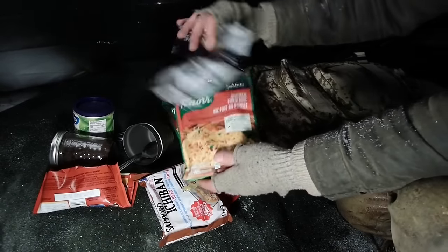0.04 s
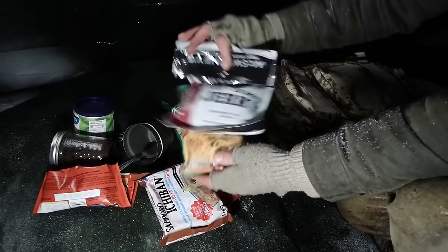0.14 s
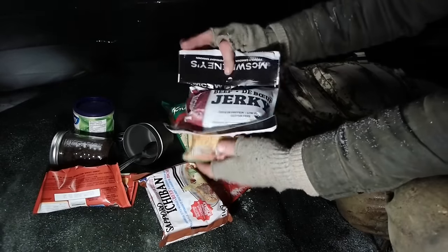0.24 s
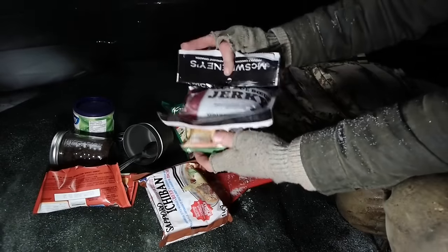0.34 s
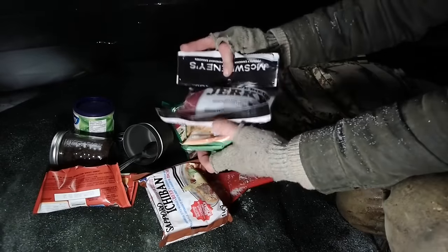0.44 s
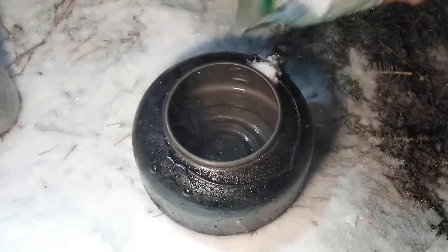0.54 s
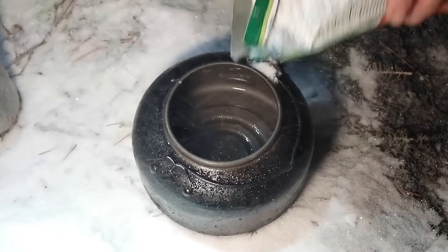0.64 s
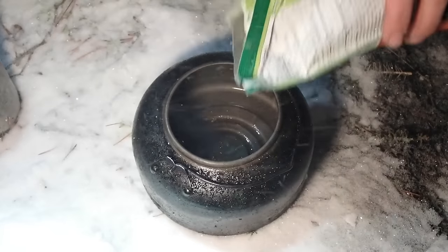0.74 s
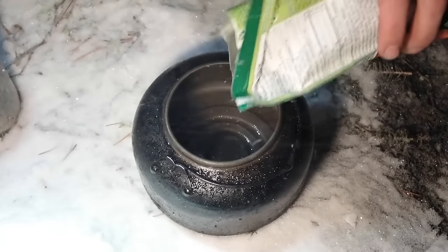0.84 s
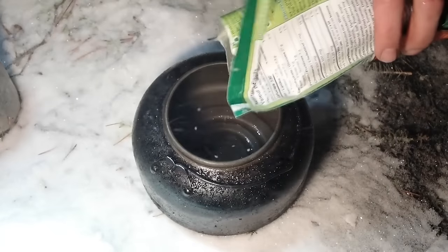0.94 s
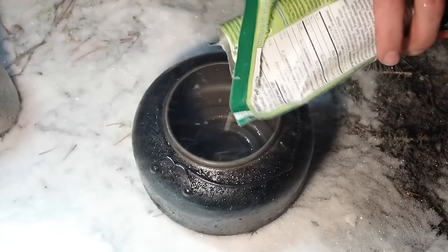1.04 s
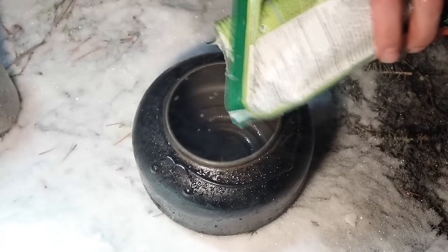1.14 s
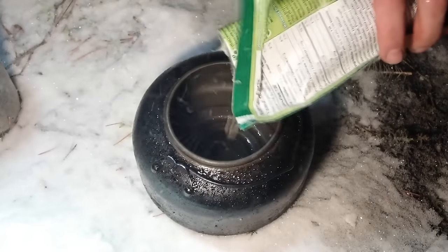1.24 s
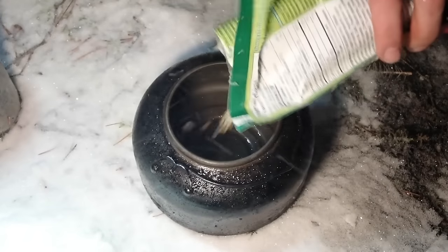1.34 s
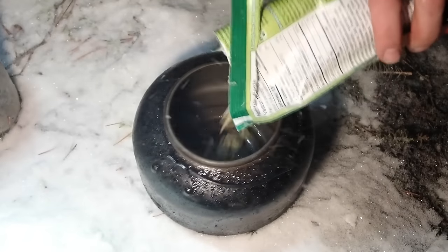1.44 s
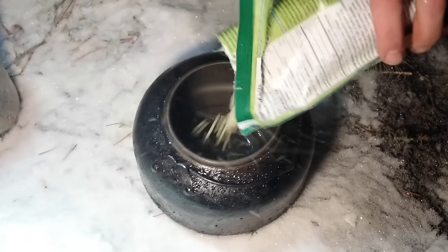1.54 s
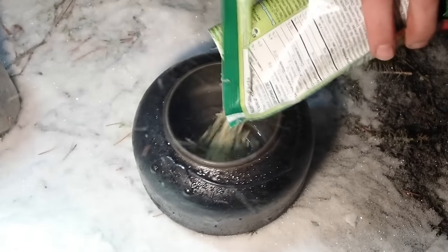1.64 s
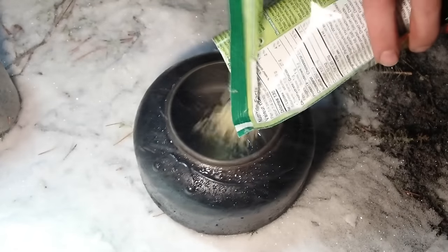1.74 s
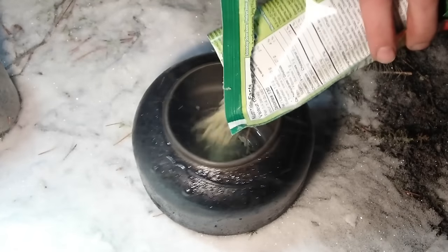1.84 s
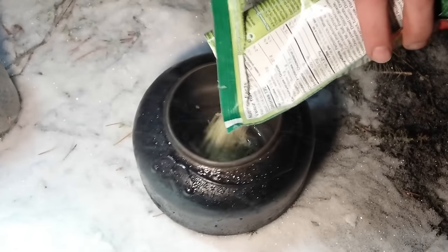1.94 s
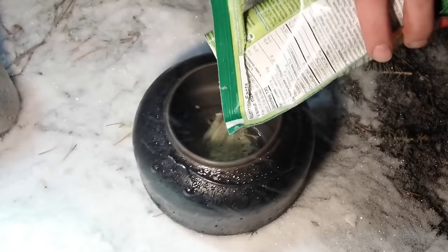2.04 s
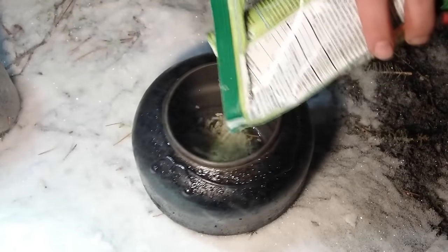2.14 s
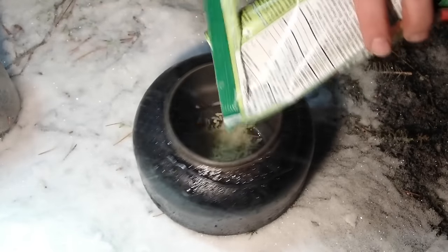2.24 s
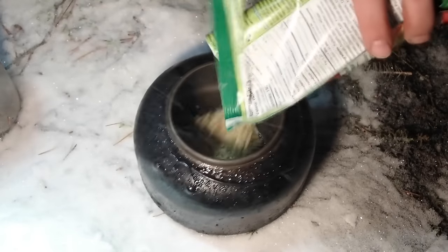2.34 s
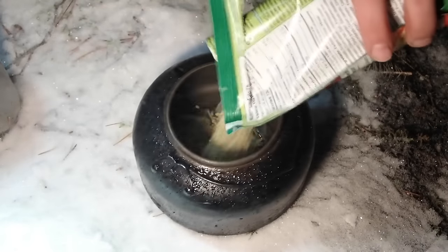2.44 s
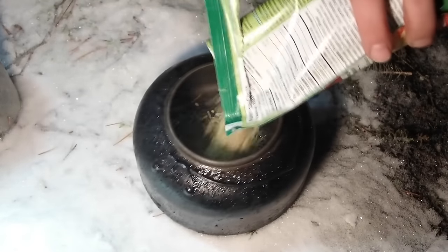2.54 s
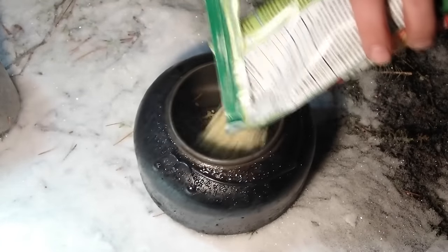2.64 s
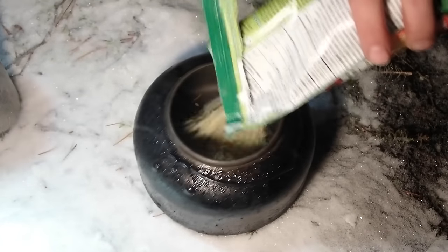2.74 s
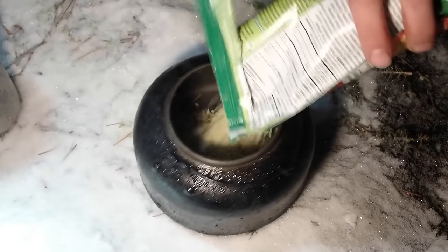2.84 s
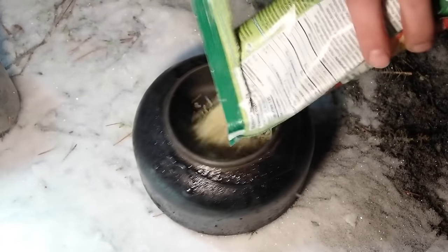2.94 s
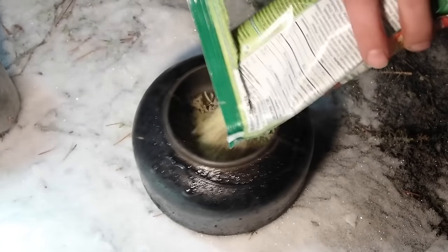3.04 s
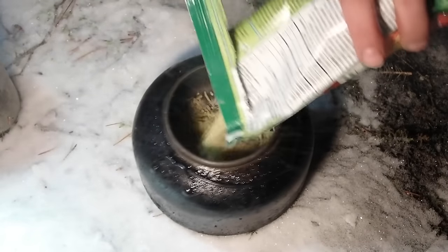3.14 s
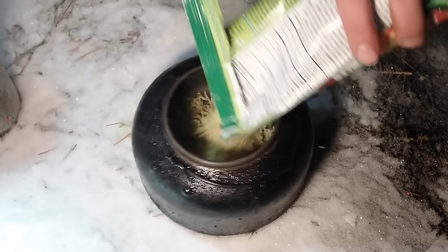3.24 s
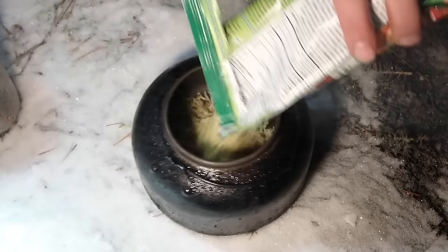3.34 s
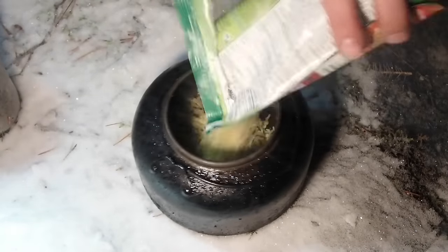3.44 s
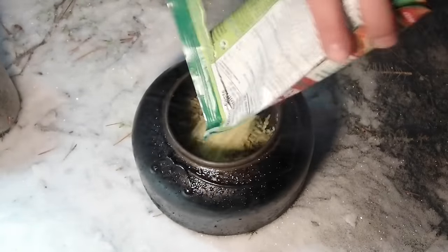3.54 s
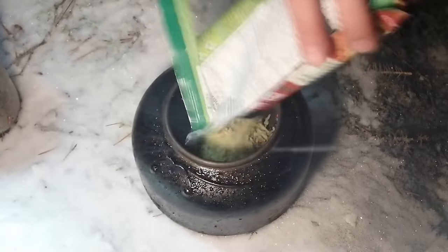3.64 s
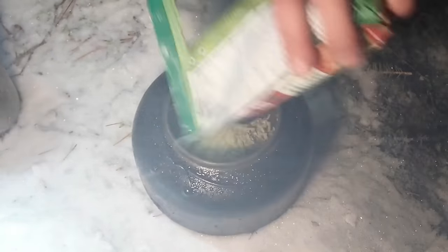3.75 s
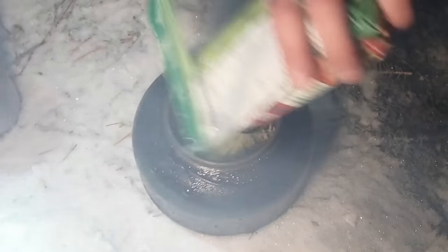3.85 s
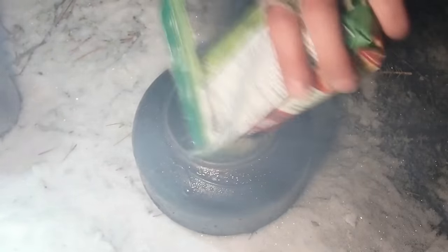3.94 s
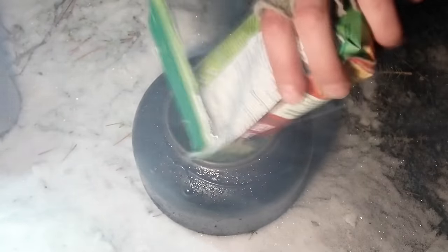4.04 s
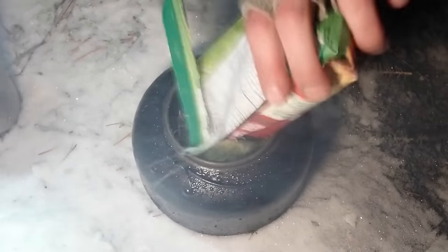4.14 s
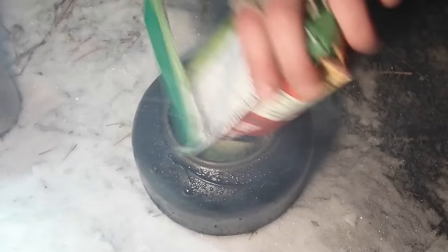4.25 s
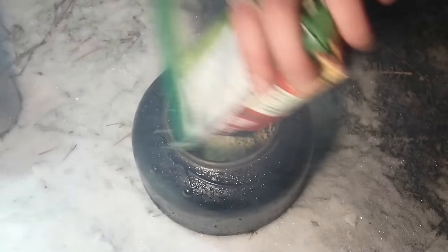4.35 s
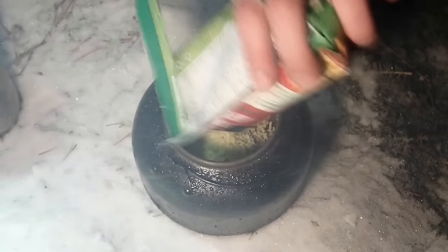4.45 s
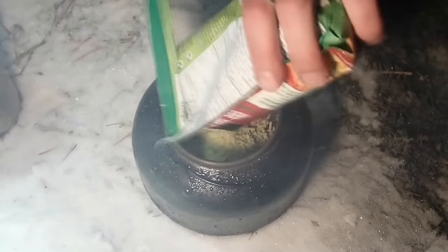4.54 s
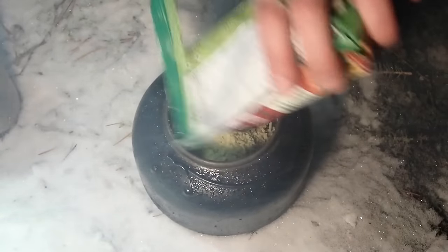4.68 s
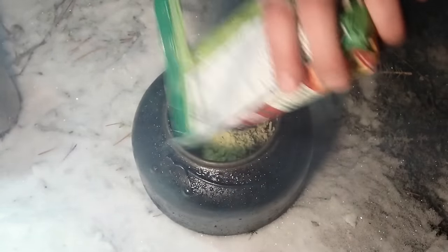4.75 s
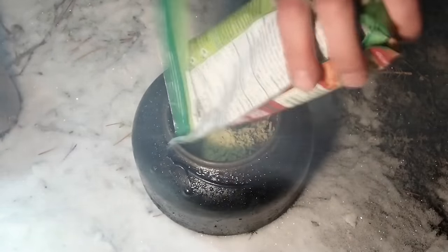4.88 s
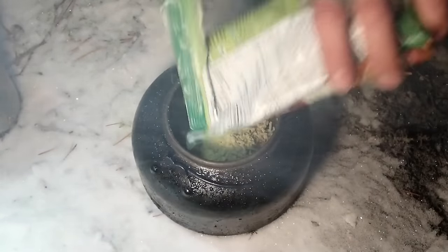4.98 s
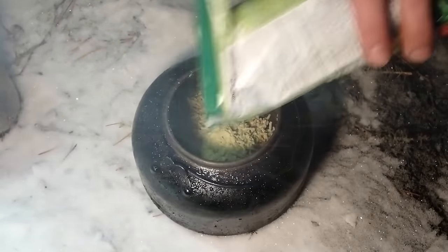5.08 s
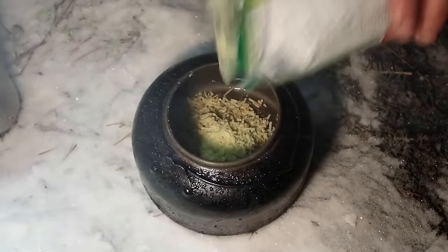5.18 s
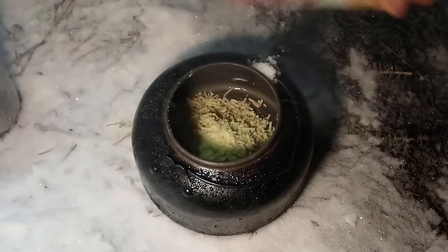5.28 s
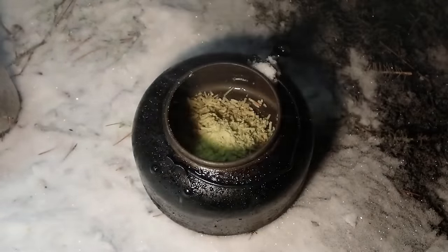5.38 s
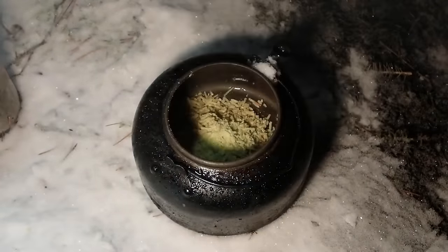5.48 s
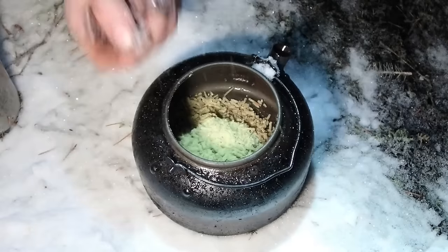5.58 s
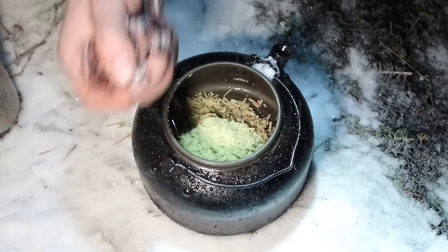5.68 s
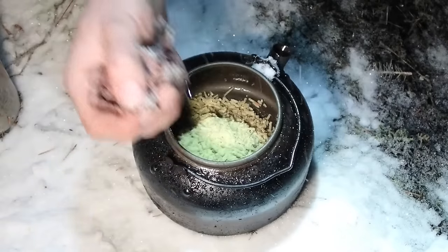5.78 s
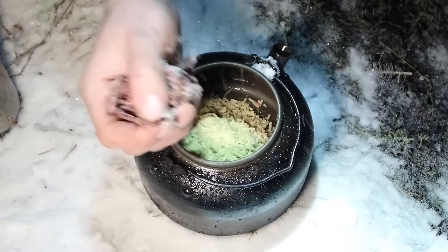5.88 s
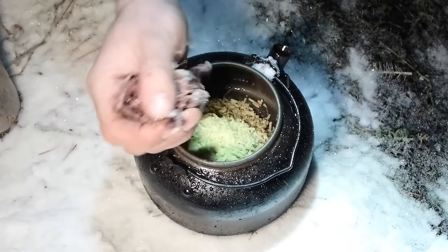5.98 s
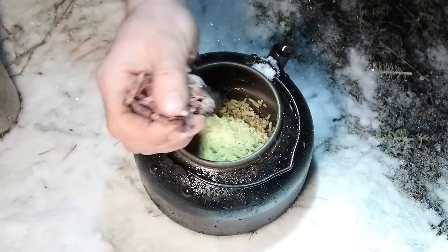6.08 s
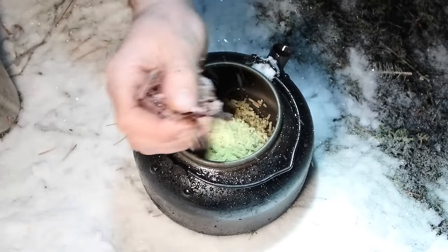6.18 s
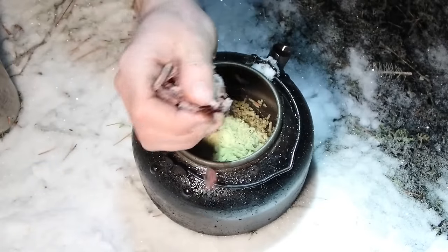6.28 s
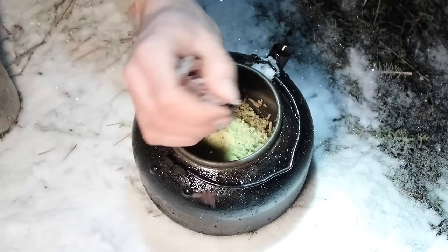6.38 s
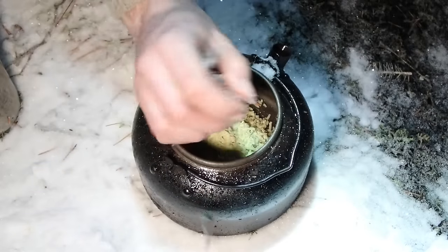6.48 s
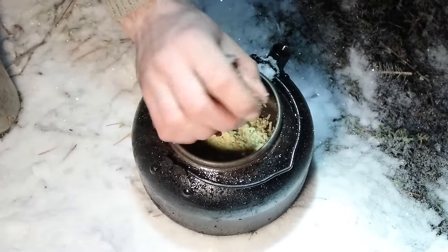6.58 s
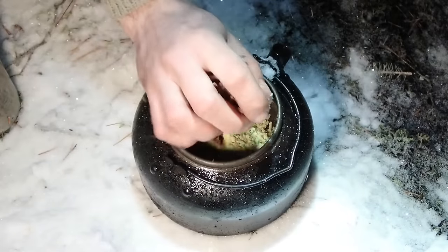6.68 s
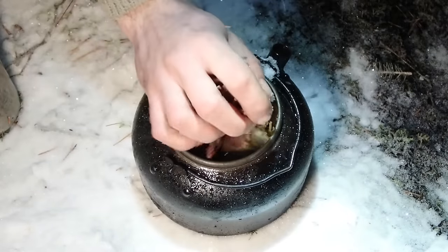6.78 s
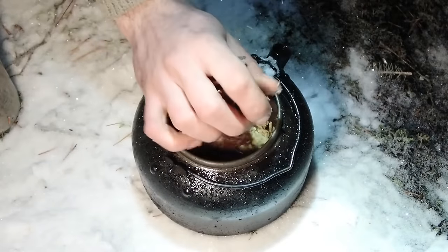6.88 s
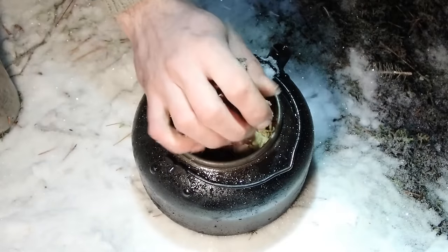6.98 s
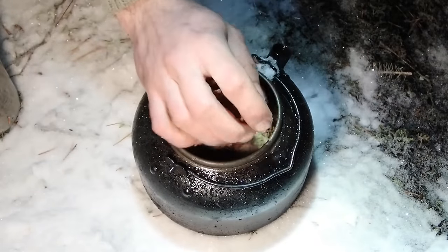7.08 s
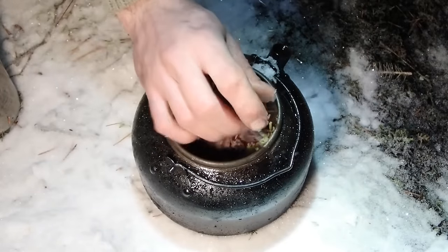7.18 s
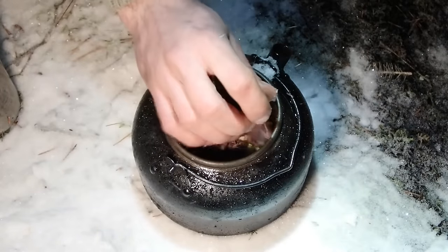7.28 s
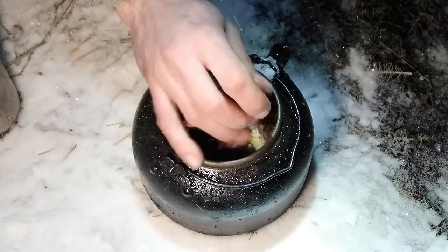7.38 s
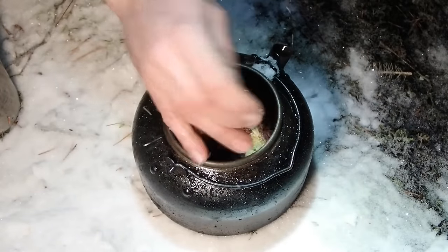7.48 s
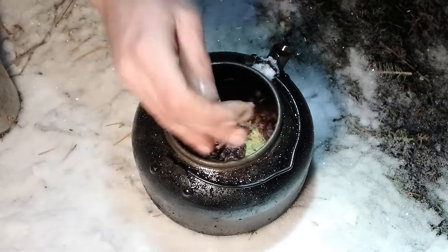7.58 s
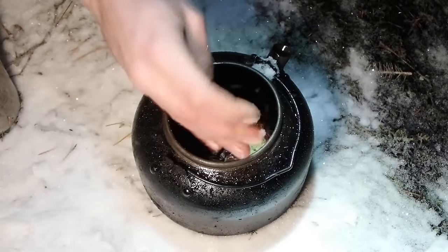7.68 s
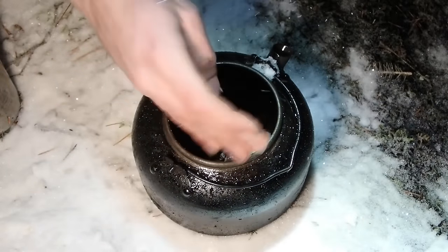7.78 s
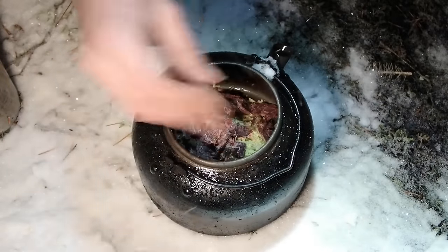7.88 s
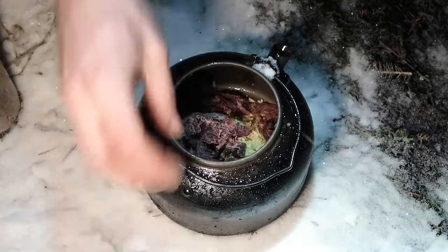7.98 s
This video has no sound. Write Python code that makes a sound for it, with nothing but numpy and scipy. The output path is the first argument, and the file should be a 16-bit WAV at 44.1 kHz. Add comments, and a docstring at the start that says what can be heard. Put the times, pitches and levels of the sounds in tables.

```python
"""Outdoors, close to the microphone: a jerky pouch is set down and dry rice is shaken into a metal kettle.
Streams of tiny impacts make the rice: it drums on the paper packet, rattles on bare metal, then lands on its heap.
Filtered bursts make the jolts and snaps of the emptying packet and the pieces of jerky dropped inside.
Dying sines ring the kettle: its bottom, its rim, its hollow, and the sharp clank when a hand knocks it."""
import sys
import numpy as np
from scipy import signal
from scipy.fft import rfft, irfft
from scipy.io import wavfile
from scipy.ndimage import uniform_filter1d

SR = 44100
rng = np.random.default_rng(int(sys.argv[2]) if len(sys.argv) > 2 else 0)


def digitize_waveform(pressure):
    """Quantize a signal to 16-bit integers and store it at the path in sys.argv[1].

    Rows of a 2-D input are taken as channels; values are limited to [-1, 1].
    """
    field = np.atleast_2d(pressure).T
    bounded = np.clip(field, -1, 1)
    quanta = np.round(bounded * 32767).astype(np.int16)
    wavfile.write(sys.argv[1], SR, quanta)


N = 353726
TIME = np.arange(N) / SR  # seconds

# Levels are relative: each layer adds its own gain. A t60 is the time to fall by 60 dB.

# Quiet outdoor background. Each row: frequency in Hz, level in dB.
AIR_SPECTRUM = [(12, -41.5), (20, -6.5), (60, -4.5), (91, -8.5), (210, -20.5), (607, -15.5), (759, -18),
                (1220, -20), (1400, -19.5), (1570, -19.5), (1710, -62), (3740, -38.5), (16000, -45.5)]
AIR_DB = -47

# A sleeve brushes past. Each row: time in seconds, level in dB.
SLEEVE_LEVEL = [(0, -34.5), (.5, -49), (5.25, -44.5), (5.47, -48), (5.57, -39.5), (5.75, -40.5), (6, -46),
                (6.6, -52), (7.8, -49), (8.02, -42)]
# Cloth, soft flaps of its folds, and air on the microphone. Each row: frequency in Hz, level in dB.
CLOTH_SPECTRUM = [(59, -23.5), (100, 2.5), (244, -2), (358, -2.5), (424, -8.5), (662, -9.5), (1680, -7.5),
                  (5770, -24.5), (9410, -27), (16000, -38.5)]
FLAP_SPECTRUM = [(60, -10), (250, 0), (800, -1), (1500, -7), (4000, -26), (16000, -45)]
PUFF_SPECTRUM = [(15, -8), (35, -4), (70, -8), (140, -19), (600, -55)]
# Air buffets the microphone. Each row: start in seconds, level in dB.
AIR_PUFFS = [(1.655, -14.5)]

# The jerky pouch is slapped down and settles.
# Each row: start in seconds, crack in dB, centre in Hz, decay constant in seconds, thud in dB.
POUCH_SLAPS = [(.008, -27.5, 1520, .004, -22), (.131, -4.5, 2860, 0.004, -52),
               (.189, -4.5, 3270, 0.0048, -13.5), (.202, -9, 4030, 0.0089, -42),
               (.215, -23, 3350, 0.057, -49), (0.274, -10.5, 1310, 0.00073, -16.5),
               (.411, 1, 2920, 0.0027, -13.5), (.478, -12, 756, 0.0013, -27)]
# The pouch slides over its neighbours. Each row: peak time in seconds, level in dB, half length in seconds.
POUCH_RUSTLES = [(0.119, -33.5, 0.036), (0.364, -36, 0.09)]
# Jerky shifts in the closed hand with dull ticks. Each row: start in seconds, level in dB.
JERKY_SHIFTS = [(5.947, -32.5), (6.084, -36), (6.206, -33), (7.556, -33.5)]
SHIFT_HZ, SHIFT_FADE_S = 1000, 0.0041
# Dull thud of the pouch and of the packet. Each row: frequency in Hz, level in dB.
THUD_SPECTRUM = [(50, -22.5), (150, -12.5), (260, -5.5), (380, -2.5), (560, -12.5), (900, -19.5),
                 (1400, -18), (4000, -41.5)]

# Light touches set the rim ringing. Each row: start in seconds, level in dB, brightness in Hz.
RIM_TOUCHES = [(3.358, -26, 11250), (3.574, -31, 11900), (3.802, -15, 8500), (3.918, -24.5, 9050),
               (4.09, -22, 12000), (4.176, -19, 11000), (4.224, -24, 11000), (4.242, -19, 9000),
               (4.45, -23, 10000), (4.69, -30, 10000), (4.976, -25, 10200), (6.879, -35, 7000),
               (7.086, -30, 3500), (7.256, -30, 3500), (7.273, -31.5, 3500)]
# The kettle's rim. Each row: frequency in Hz, level in dB, t60 in seconds.
RIM_MODES = [(4400, 9, 0.048), (4640, -21.5, 0.042), (5060, 10.5, 0.048), (5500, -7, .06),
             (5770, 9.5, 0.042), (7600, -14.5, 0.044), (8700, 12, 0.046), (9560, 12, 0.012),
             (10300, -18, 0.066), (10740, 1, 0.083)]
# Stray grains and crumbs tick. Each row: start in seconds, level in dB.
CRUMB_TICKS = [(5.335, -27), (5.523, -22), (5.545, -23.5), (6.001, -13.5), (6.257, -21), (6.468, -17),
               (6.849, -16), (7.397, -19)]
# A scrape and a crumb on the rim. Each row: frequency in Hz, level in dB.
SCRAPE_SPECTRUM = [(1500, -8), (3700, -9), (4900, 1.5), (6200, -8), (7500, -9), (9500, -8), (16000, -20)]
CRUMB_SPECTRUM = [(300, -13), (2000, 8.5), (5000, 11), (10000, 9.5), (16000, -6)]

# Fingers and jerky rub along the rim. Each row: peak time in seconds, level in dB, half length in seconds.
RUB_STROKES = [(6.386, -43.5, .025), (6.52, -51, .09), (6.9, -42, 0.035), (7.211, -47, .18)]
# Share of the rubbing that is deep inside. Each row: time in seconds, share.
RUB_DEPTH = [(6.7, 0), (6.8, 1), (7.35, 1), (7.6, .5)]
# Rubbed metal and the stirred hollow. Each row: frequency in Hz, level in dB, t60 in seconds.
RUB_MODES = [(2080, -7, .05), (2590, -7, 0.032), (4070, -8, .03), (4500, -4, .03), (5250, -2, .025),
             (6090, -3, .025), (8930, -5, .04)]
RUB_HOLLOW_MODES = [(383, -10, .064), (432, 5, 0.053), (490, -15, 0.026)]
# Rough scratch. Each row: frequency in Hz, level in dB.
SCRATCH_SPECTRUM = [(150, -4), (400, -7), (700, -3), (1200, -13), (2600, -12), (5000, 0), (9000, -5),
                    (16000, -16)]

# Pieces of jerky land on the heap. Each row: start in seconds, level in dB.
JERKY_PLOPS = [(6.143, -33.5), (6.356, -42), (6.786, -35.5), (6.804, -27.5), (6.829, -31), (6.92, -30.5),
               (7.08, -40), (7.104, -29.5), (7.141, -33), (7.186, -27), (7.247, -34.5), (7.31, -30.5),
               (7.513, -36), (7.723, -35)]
CLUMP_HZ, PIECE_HZ = 370, 405  # pitch of the hollow under rice and under jerky
# Soft impacts heard through the kettle's hollow. Each row: frequency in Hz, level in dB.
HOLLOW_SPECTRUM = [(100, -27), (300, -15), (390, -5.5), (430, 0.5), (490, -1), (650, -14.5), (1200, -23),
                   (2600, -25.5), (6000, -35.5), (15000, -44)]

# The hand knocks the kettle, which rebounds.
# Each row: start in seconds, ring in dB, crack in dB, brightness in Hz.
HAND_KNOCKS = [(6.287, -28, -37, 2500), (6.295, -15, -10, 9000), (6.353, -22.5, -48, 2450)]
# The kettle's body. Each row: frequency in Hz, level in dB, t60 in seconds.
BODY_MODES = [(450, -10, 0.15), (786, -9.5, 0.11), (1012, 4, 0.061), (1232, 2, 0.16), (1567, -13, 0.099),
              (2060, -0.5, 0.024), (2470, -11, 0.26), (2560, -10, 0.14), (3170, -25, 0.15),
              (3730, -3.5, 0.11), (3960, -10, 0.083), (4630, -13, .08), (5700, -7.5, 0.12), (6150, -9, .04),
              (7900, 0.5, 0.019), (10650, -7, 0.023)]
# Hard contact of the knock. Each row: frequency in Hz, level in dB.
KNOCK_SPECTRUM = [(200, -29), (600, -9.5), (1000, -2), (1600, -31), (3600, 8.5), (6200, 17.0), (7200, -2),
                  (10800, 0), (16000, -44)]

# The wrist jerks the packet, at first about six times a second, later about nine, and stops it after each swing.
# Each row: start in seconds, jerk in dB, swing in seconds, stop in dB.
WRIST_SHAKES = [(1.179, -43.5, 0.055, -17.5), (1.35, -49, 0.056, -21.5), (1.521, -46, 0.052, -15),
                (1.7, -45, 0.058, -17.5), (1.83, -47.5, 0.051, -20.5), (2.188, -29, 0.026, -24),
                (2.296, -21.5, 0.037, -18), (2.402, -29, 0.037, -20), (2.508, -31, 0.035, -19.5),
                (2.62, -24.5, 0.037, -17.5), (2.722, -25, 0.043, -17.5), (2.83, -21.5, 0.048, -16),
                (2.943, -23, 0.046, -18), (3.051, -22, 0.042, -19), (3.157, -21, 0.049, -17),
                (3.274, -24, 0.045, -19.5), (3.378, -24.5, 0.056, -20), (3.515, -20.5, 0.033, -20.5),
                (3.6, -23.5, 0.046, -21.5), (3.725, -19, 0.045, -20), (3.838, -15.5, 0.04, -22),
                (3.949, -17, .044, -18), (4.06, -16, 0.053, -15), (4.176, -18.5, 0.046, -17.5),
                (4.29, -18.5, 0.051, -20.5), (4.4, -17, 0.056, -19.5), (4.508, -17, 0.037, -19.5),
                (4.617, -17, .049, -22.5), (4.733, -16, 0.061, -24.5), (4.842, -15.5, 0.061, -14),
                (4.96, -21, .063, -22.5), (5.093, -23.5, 0.082, -36.5)]
JERK_SNAP_DB, JERK_FADE_S, STOP_SNAP_DB, STOP_FADE_S = 1.5, 0.0062, 9.5, 0.0031
JERK_HZ, CREASE_HZ, CREASE_FADE_S = 1730, 2074, 0.0047
# The packet empties. Each row: time in seconds, load of rice in dB, half length of a surge in seconds.
PACKET_LOAD = [(1.6, -0.5, 0.029), (2.3, -0.4, 0.021), (3, -0.04, 0.024), (3.25, 1.5, 0.012),
               (3.55, -5.5, 0.018), (4.1, -6.5, 0.017), (4.35, -14.5, 0.01), (4.9, -17.5, 0.015),
               (5.2, -27, 0.01)]
# Creases flip as fingers squeeze the slack packet. Each row: start in seconds, level in dB.
CREASE_SNAPS = [(3.661, -18), (3.78, -10), (3.901, -10.5), (3.965, -16), (4.007, -10.5), (4.031, -12.5),
                (4.072, -16.5), (4.088, -12.5), (4.124, -14), (4.201, -17), (4.229, -13.5), (4.313, -14),
                (4.355, -19), (4.554, -17), (4.897, -16), (5.07, -26), (5.107, -20.5), (5.145, -36),
                (5.176, -30), (5.277, -19.5)]
# A snap centred on 2000 Hz. Each row: frequency in Hz, level in dB.
SNAP_SPECTRUM = [(60, -15.5), (250, -8.5), (900, -2), (2100, -2), (3600, -9.5), (6000, -15.5), (10000, -24),
                 (16000, -49)]
SLIP_SPREAD_DB, FACET_DB, EDGE_DB = 5, -14.5, 3  # uneven slips, ringing facet, bright edge of a snap
HARD_SNAP_DB, SNAP_DB_PER_OCTAVE = -11, 11  # stop snaps harder than this grow brighter
# Fine crumpling of the paper, strongest during the swings. Each row: time in seconds, level in dB.
CRUMPLE_LEVEL = [(2.2, -42.5), (3.6, -32.5), (3.8, -27), (4.12, -23.5), (4.3, -35), (5.03, -40),
                 (5.17, -31.5), (5.3, -33), (5.6, -35)]
# Facets of the crumpled paper. Each row: frequency in Hz, level in dB, t60 in seconds.
PAPER_FACETS = [(hz, 0, .005) for hz in (1150, 1700, 2300, 2900, 3700)]
# The air in the open packet. Each row: frequency in Hz, level in dB.
POCKET_SPECTRUM = [(400, 0), (660, -4.5), (900, 5.5), (1100, 2), (1300, -4.5), (1700, 0), (3000, 1)]

# Rice slides steadily in the tilted packet. Each row: time in seconds, level in dB.
SLIDE_LEVEL = [(.4, -43), (.56, -36.5), (.76, -26.5), (.92, -29.5), (1.1, -30.5), (1.15, -36.5), (1.3, -33),
               (1.9, -36.5), (2.03, -32), (2.26, -42.5), (3.2, -38.5), (3.7, -49.5), (5, -78), (5.18, -49),
               (5.7, -81)]
# Rice on paper, and the brighter sound of faster rice. Each row: frequency in Hz, level in dB.
PAPER_SPECTRUM = [(59, -33), (100, -9.5), (153, -9), (215, -9.5), (452, -8), (558, -6), (1010, -3),
                  (1450, -2), (2080, -1), (3120, -3), (4470, -8.5), (9210, -14.5), (11900, -22.5),
                  (16000, -32)]
SURGE_SPECTRUM = [(59, -40.5), (100, -8.5), (215, -15), (461, -0.5), (662, -3.5), (1010, 0), (1390, -2.5),
                  (1580, -1), (2000, 1), (3120, 1), (4470, -4.5), (9210, -11), (11900, -16), (16000, -30)]
# Contacts with the paper per second; the first is added to the second at a load of 0 dB.
FULL_GRAINS_PER_S, EMPTY_GRAINS_PER_S, SLIDE_GRAINS_PER_S = 8000, 900, 5000

# Handfuls of grains land on bare metal; their weight sounds the hollow.
# Each row: start in seconds, rattle in dB, decay constant in seconds, hollow in dB.
RICE_SPILLS = [(1.166, -23.5, 0.0069, -45), (1.272, -47, 0.025, -26), (1.346, -20.5, 0.021, -25.5),
               (1.415, -19.5, 0.005, -22.5), (1.448, -17.5, 0.0038, -47), (1.478, -16.5, 0.016, -22),
               (1.492, -11.5, 0.0068, -34), (1.521, -18, 0.03, -18.5), (1.641, -21.5, 0.0095, -36),
               (1.661, -16.5, 0.036, -21.5), (1.69, -20, 0.014, -18), (1.737, -23.5, .01, -15.5),
               (1.786, -32.5, .013, -24), (1.823, -24.5, 0.008, -42), (1.85, -23, 0.035, -14),
               (1.954, -30, 0.039, -30.5), (2.37, -29, 0.016, -50)]
# The bare kettle bottom rings. Each row: frequency in Hz, level in dB.
BOTTOM_MODES = [(1480, 4), (1986, 0.5), (3090, -4.5), (3800, 0.5), (4990, -0.5), (6185, 1), (6277, 2.5),
                (7817, 1), (8000, 4), (8592, -3), (8753, -4), (9577, -2), (9755, -6), (9935, 2),
                (10050, -1), (11736, -8)]
# The air in the empty kettle. Each row: frequency in Hz, level in dB, t60 in seconds.
CAVITY_MODES = [(330, 6, 0.052), (381, -9.5, 0.089), (429.6, 18, 0.12), (451, -12, 0.042),
                (545, -18.5, .04), (640, 8, 0.038)]
# The last grains drop singly on the metal. Each row: time in seconds, level in dB.
DRIBBLE_LEVEL = [(2.9, -47), (3.25, -36), (3.7, -43.5), (3.85, -31), (4.2, -41.5), (4.7, -44), (5, -40.5),
                 (5.4, -90)]
# A grain on the bottom, and on the wall. Each row: frequency in Hz, level in dB.
TICK_SPECTRUM = [(200, -27), (450, -12.5), (900, -12.5), (3000, -1.5), (6500, -1), (10000, 3),
                 (12000, -1.5), (16000, -12.5)]
WALL_TICK_SPECTRUM = [(500, -19), (3000, -35), (5500, -14), (7500, -9.5), (9500, 19), (12000, 11), (16000, 1)]

# Phase between the microphone ports. Each row: frequency in Hz, lead of the left in radians.
PHASE_LEAD = [(50, 0), (2000, -.12), (4500, -.5), (7000, -.95), (9500, -1.3), (13000, -1.25), (16000, -2.0)]
# What the ports do not share. Each row: frequency in Hz, level in dB.
UNSHARED_LEVEL = [(30, -5), (120, -8), (300, -14), (1500, -15), (4000, -10), (9000, -8), (15000, -6)]
# Tilt between the ports: added on the left, taken off on the right. Each row: frequency in Hz, level in dB.
PORT_LEAN = [(40, 2), (250, 1), (500, 0), (4000, .4), (8000, 0)]
EDGE_HZ = 15900  # upper band limit


def amp(db):
    """Decibels to gain."""
    return 10 ** (np.asarray(db) / 20)


def unit(x):
    """Scales to an rms of one."""
    return x / np.sqrt(np.mean(x ** 2) + 1e-20)


def read(points, hz):
    """Reads a spectrum on a log-frequency axis."""
    f, value = np.transpose(points)
    return np.interp(np.log(hz + 1), np.log(f + 1), value)


def curve(points):
    """Reads a control curve at every sample."""
    return np.interp(TIME, *np.transpose(points))


def swell(s, half):
    """A smooth rise and fall around time s."""
    return np.exp(-np.minimum(((TIME - s) / half) ** 2, 60))


def add(mix, s, sound):
    """Mixes a sound in at time s."""
    part = mix[max(round(s * SR), 0):][:len(sound)]
    part += sound[:len(part)]


def colour(x, points, shift=1, size=2048):
    """Causal filter of unit energy with the given spectrum, moved in frequency by a factor."""
    hz = abs(np.fft.fftfreq(size, 1 / SR)) / shift
    log_gain = np.log(amp(read(points, hz)))
    minimum_phase = np.exp(np.conj(signal.hilbert(log_gain)))
    taps = np.fft.ifft(minimum_phase).real[:size // 2]
    return signal.oaconvolve(x, taps / np.linalg.norm(taps))[:len(x)]


def ringing(modes, size=16384):
    """Dying sines of random phase, one for each mode."""
    t = TIME[:size]
    return sum(amp(db - 60 * t / t60) * np.sin(2 * np.pi * (hz * t + rng.random())) for hz, db, t60 in modes)


def ring(x, modes):
    """Passes x through a set of modes whose combined response has unit energy."""
    taps = ringing(modes)
    return signal.oaconvolve(x, taps / np.linalg.norm(taps))[:len(x)]


def soften(modes, bright_hz, power):
    """Weakens the modes above the brightness, as a softer contact does."""
    return [(hz, db - 10 * np.log10(1 + (hz / bright_hz) ** power), t60) for hz, db, t60 in modes]


def ring_spots(x, modes, vary_db, count=5):
    """Impacts wander between spots, and each spot rings with its own mix of the modes."""
    spot = np.repeat(rng.integers(0, count, N // 900 + 1), 900)[:N]
    gains = vary_db * rng.standard_normal((count, len(modes)))
    out = np.zeros(N)
    for k in range(count):
        spot_modes = [(hz, db + g, t60) for (hz, db, t60), g in zip(modes, gains[k])]
        out += ring(x * (spot == k), spot_modes)
    return out


def grains(per_s, spread_db):
    """Random impacts of uneven size, with a mean power of one."""
    chance = np.clip(per_s / SR, 1e-5, 1)
    size = unit(amp(spread_db * np.minimum(rng.exponential(1, N), 3.5)))
    return size * rng.choice([-1, 1], N) * (rng.random(N) < chance) / np.sqrt(chance)


def burst(rise, fade, size=12000):
    """Noise that swells quickly and dies away."""
    t = TIME[:size]
    return (1 - np.exp(-t / rise)) * np.exp(-t / fade) * rng.choice([-1, 1], size)


def crackle(rise, fade, size=4000):
    """A burst made of uneven slips, with the energy of a smooth one."""
    smooth = burst(rise, fade, size)
    slips = smooth * amp(SLIP_SPREAD_DB * np.minimum(rng.standard_normal(size), 2))
    return slips * np.linalg.norm(smooth) / np.linalg.norm(slips)


def snap(db, hz, fade):
    """A crease flips: a short crack, the brief ring of its facet and a bright edge."""
    slips = crackle(rise=min(0.25 * fade, .003), fade=fade)  # longer cracks also build up more slowly
    crack = colour(slips, SNAP_SPECTRUM, hz / 2000)
    facet = [(hz * f, 0, .008) for f in rng.uniform(.4, 1.6, size=3)]
    edge_burst = burst(rise=0.0012, fade=0.17 * fade, size=len(crack))
    edge = colour(edge_burst, SNAP_SPECTRUM, hz / 1000)  # an octave above the crack
    return amp(db + 2.0) * (crack + amp(FACET_DB) * ring(crack, facet)) + amp(db + EDGE_DB) * edge


def air():
    """Quiet outdoor air comes from all sides, so the two ports share only part of it."""
    shared, apart = (colour(rng.standard_normal(N), AIR_SPECTRUM, size=8192) for _ in range(2))
    left = amp(1) * (shared + .55 * apart)
    right = amp(-1) * (shared - .55 * apart)
    return amp(AIR_DB) * np.array([left, right])


def handling():
    """A sleeve brushes with dense friction and soft flaps of its folds; low puffs strike the microphone."""
    brush = amp(curve(SLEEVE_LEVEL))
    out = colour(brush * grains(8000, spread_db=4.0), CLOTH_SPECTRUM)
    out += amp(-7) * colour(brush * grains(45, spread_db=2), FLAP_SPECTRUM)
    for s, db in AIR_PUFFS:
        add(out, s, amp(db) * colour(burst(rise=.003, fade=.014), PUFF_SPECTRUM, size=8192))
    return out


def pouch():
    """The flat plastic pouch cracks, thuds and rustles as it is set down; later its jerky shifts in the hand."""
    sliding = sum(amp(db) * swell(s, half) for s, db, half in POUCH_RUSTLES)
    out = colour(sliding * grains(9000, spread_db=5.0), SURGE_SPECTRUM)
    for s, db, hz, fade, thud_db in POUCH_SLAPS:
        thud = colour(burst(rise=0.00082, fade=0.0061), THUD_SPECTRUM, shift=1.16)
        add(out, s, snap(db, hz, fade))
        add(out, s, amp(thud_db) * thud)
    for s, db in JERKY_SHIFTS:
        add(out, s, snap(db, SHIFT_HZ, SHIFT_FADE_S))
    return out


def rim():
    """Each brief scrape finds another spot on the rim, so another mix of its high modes; crumbs tick on it."""
    out, ticks = np.zeros(N), np.zeros(N)
    for s, db, bright_hz in RIM_TOUCHES:
        scrape = amp(db) * burst(rise=0.0015, fade=0.0074)
        spot_db = 3 * rng.standard_normal(len(RIM_MODES))
        modes = [(hz, mode_db + spot, t60) for (hz, mode_db, t60), spot in zip(RIM_MODES, spot_db)]
        add(out, s, amp(1.5) * ring(scrape, soften(modes, bright_hz, power=4)))
        add(out, s, amp(1.5) * colour(scrape, SCRAPE_SPECTRUM))
    for s, db in CRUMB_TICKS:
        add(ticks, s, amp(db) * burst(rise=0.00035, fade=0.0017))
    return out + amp(-9) * colour(ticks, CRUMB_SPECTRUM)


def rubbing():
    """Skin and dry meat catch on the rim with a rough scratch; deeper inside they crunch and stir the hollow."""
    pressure = np.sqrt(sum(amp(db) ** 2 * swell(s, half) for s, db, half in RUB_STROKES))
    catches = pressure * grains(500, spread_db=4)
    metal = amp(-6) * ring_spots(catches, RUB_MODES, vary_db=6, count=8)
    scratch = amp(-5.5) * colour(catches, SCRATCH_SPECTRUM)
    inside = curve(RUB_DEPTH) * pressure
    hollow = amp(4) * ring(inside * grains(1500, spread_db=-1.5), RUB_HOLLOW_MODES)
    crunch = amp(-4.5) * colour(inside * grains(300, spread_db=4.5), SNAP_SPECTRUM)
    return metal + scratch + hollow + crunch


def landings():
    """Clumps of rice and pieces of jerky drop inside and sound the air in the kettle."""
    out = np.zeros(N)
    clumps = [(s, db, CLUMP_HZ) for s, _, _, db in RICE_SPILLS]
    pieces = [(s, db, PIECE_HZ) for s, db in JERKY_PLOPS]
    for s, db, hz in clumps + pieces:
        pat = colour(burst(rise=.002, fade=.011), HOLLOW_SPECTRUM, hz / 425)
        add(out, s, amp(db + 26.0) * pat / np.linalg.norm(pat))
    return out


def clank():
    """A hard contact cracks and rings the kettle's body; softer contacts excite mostly the low modes."""
    out = np.zeros(N)
    for s, ring_db, crack_db, bright_hz in HAND_KNOCKS:
        body = ringing(soften(BODY_MODES, bright_hz, power=2))
        onset = 1 - np.exp(-TIME[:len(body)] / .0005)
        add(out, s, amp(ring_db) * body * onset)
        add(out, s, amp(crack_db) * colour(burst(rise=0.0004, fade=0.0051), KNOCK_SPECTRUM))
    return out


def load(s):
    """Load of rice in the packet at time s, as a gain, and the half length of a surge."""
    when, db, half = np.transpose(PACKET_LOAD)
    return amp(np.interp(s, when, db)), np.interp(s, when, half)


def packet():
    """Each jerk thuds and snaps the wall; each stop snaps it again as less rice cushions it; the pocket colours all."""
    out, swinging = np.zeros(N), np.zeros(N)
    for s, jerk_db, swing, stop_db in WRIST_SHAKES:
        slack = 1 - load(s + swing)[0]
        snap_db = stop_db + STOP_SNAP_DB
        hz = CREASE_HZ * 2 ** (max(snap_db - HARD_SNAP_DB, 0) / SNAP_DB_PER_OCTAVE)
        thud = colour(burst(rise=0.0018, fade=0.02), THUD_SPECTRUM, shift=1.063)
        add(out, s + .002, amp(jerk_db) * thud)
        add(out, s, snap(jerk_db + JERK_SNAP_DB, JERK_HZ, JERK_FADE_S))
        add(out, s + swing, slack * snap(snap_db, hz, STOP_FADE_S))
        swinging += swell(s + 0.82 * swing, half=0.041)
    for s, db in CREASE_SNAPS:
        add(out, s, snap(db, CREASE_HZ, CREASE_FADE_S))
    creasing = (swinging + amp(-15.5)) * amp(curve(CRUMPLE_LEVEL))
    creasing += amp(-2.5) * amp(curve(SLIDE_LEVEL))  # the sliding rice flips creases too
    flips = creasing * grains(500, spread_db=6.0)
    out += amp(-2.5) * colour(flips, SNAP_SPECTRUM, shift=0.97)
    out += amp(-4.0) * ring_spots(flips, PAPER_FACETS, vary_db=9)
    return colour(out, POCKET_SPECTRUM)


def surges(delay=0.):
    """Each stop throws rice forward, the more the fuller the packet."""
    power = np.zeros(N)
    for s, _, swing, stop_db in WRIST_SHAKES:
        share, half = load(s + swing)
        power += (share * amp(stop_db)) ** 2 * swell(s + swing + delay, half)
    return np.sqrt(power)


def sliding_rice():
    """Thousands of tiny contacts drum on the paper wall; in the surges they thin out as the packet empties."""
    steady = amp(curve(SLIDE_LEVEL)) * grains(SLIDE_GRAINS_PER_S, spread_db=5.0)
    flow = EMPTY_GRAINS_PER_S + FULL_GRAINS_PER_S * load(TIME)[0] ** 2
    thrown = surges() * grains(flow, spread_db=4)
    return colour(steady, PAPER_SPECTRUM) + colour(thrown, SURGE_SPECTRUM)


def rice_on_bottom():
    """Handfuls of grains strike and ring the bare bottom; their weight pushes the air in the kettle."""
    flow, t = np.zeros(N), TIME[:SR // 2]
    for s, db, fade, _ in RICE_SPILLS:
        handful = amp(db) * (1 - np.exp(-t / 0.0013)) * np.exp(-t / fade)
        add(flow, s, handful ** 2)
    hits = np.sqrt(flow) * grains(1800, spread_db=2.0)
    ticks = amp(4.5) * colour(hits, TICK_SPECTRUM)
    bottom = [(hz, db, .075) for hz, db in BOTTOM_MODES]
    metal = amp(3.5) * ring_spots(hits, bottom, vary_db=4, count=8)
    weight = np.sqrt(abs(uniform_filter1d(flow, size=1800)))  # the mass of many grains
    hollow = amp(-3.5) * ring_spots(weight * grains(300, spread_db=4), CAVITY_MODES, vary_db=13.5)
    return ticks + metal + hollow


def rice_on_wall():
    """A few stray grains reach the kettle's wall and tick on its high modes, damped shorter than the free rim."""
    strays = amp(-18.5) * surges(delay=0.021) * grains(220, spread_db=-2.0)
    strays += amp(curve(DRIBBLE_LEVEL)) * grains(150, spread_db=6.0)
    damped = [(hz, db, .4 * t60) for hz, db, t60 in RIM_MODES[2:]]
    wall = amp(-9) * ring_spots(strays, damped, vary_db=5)
    return wall + amp(-5) * colour(strays, WALL_TICK_SPECTRUM)


def rice_on_heap():
    """Thrown rice lands softly on the heap, and a thin stream trickles on beneath the shakes."""
    heap = amp(-20.0) * colour(surges(delay=0.045) * grains(3000, spread_db=10.0), HOLLOW_SPECTRUM)
    started = TIME > RICE_SPILLS[0][0]
    trickle = started * amp(curve(SLIDE_LEVEL)) * grains(900, spread_db=1)
    return heap + amp(-6.5) * colour(trickle, HOLLOW_SPECTRUM, shift=1.11)


def ports(x):
    """Two microphone ports: the left hears a little later, by an amount that varies from impact to impact."""
    hz = np.fft.rfftfreq(N, 1 / SR)
    lowpass = signal.butter(2, 90, fs=SR, output="sos")
    place = unit(signal.sosfilt(lowpass, rng.standard_normal(N)))
    direct = rfft(x)
    scattered = 1j * rfft(x * place) * amp(read(UNSHARED_LEVEL, hz))
    turn = np.exp(.5j * read(PHASE_LEAD, hz))
    lean = amp(read(PORT_LEAN, hz))
    left = (direct + scattered) * turn * lean
    right = (direct - scattered) / turn / lean
    return irfft(np.array([left, right]), N)


def scene():
    """Everything happens close to the microphone, with no room around it."""
    hands = handling() + pouch() + rim() + rubbing() + landings() + clank()
    rice = packet() + sliding_rice() + rice_on_bottom() + rice_on_wall() + rice_on_heap()
    return air() + ports(hands + rice)


def record(dry):
    """Peaks beyond full scale clip; then the band limit."""
    clipped = np.clip(dry, -1, 1)
    lowpass = signal.firwin(255, EDGE_HZ, window=("kaiser", 8), fs=SR)
    return signal.oaconvolve(clipped, lowpass[None], "same")


dry = scene()
out = record(dry)
digitize_waveform(out)
```